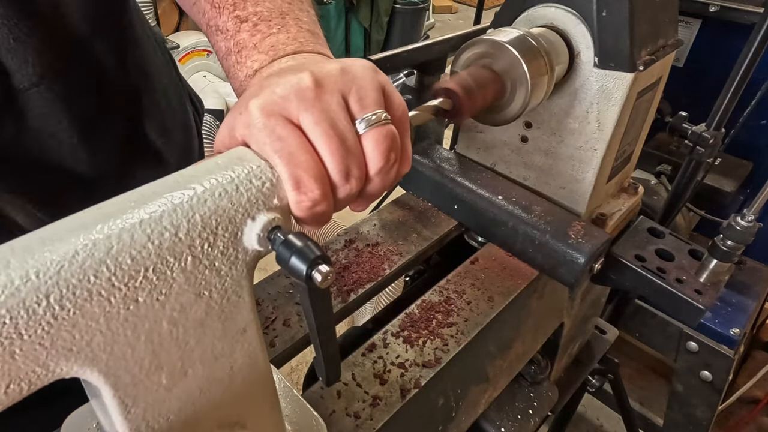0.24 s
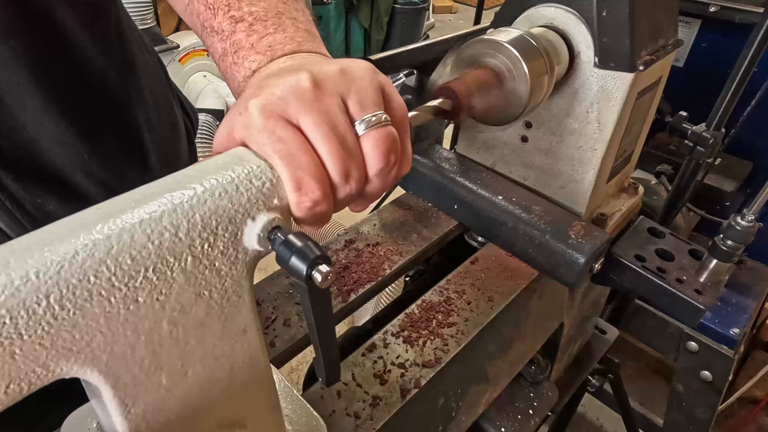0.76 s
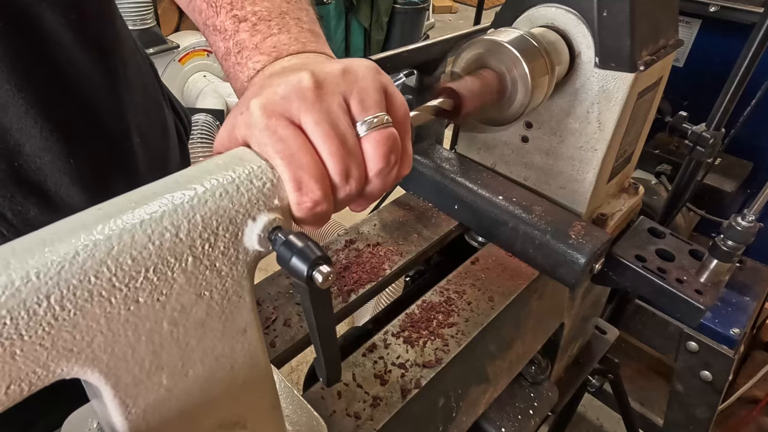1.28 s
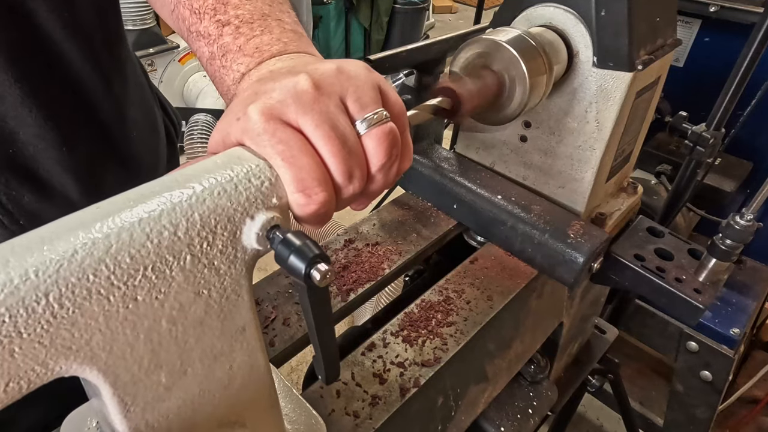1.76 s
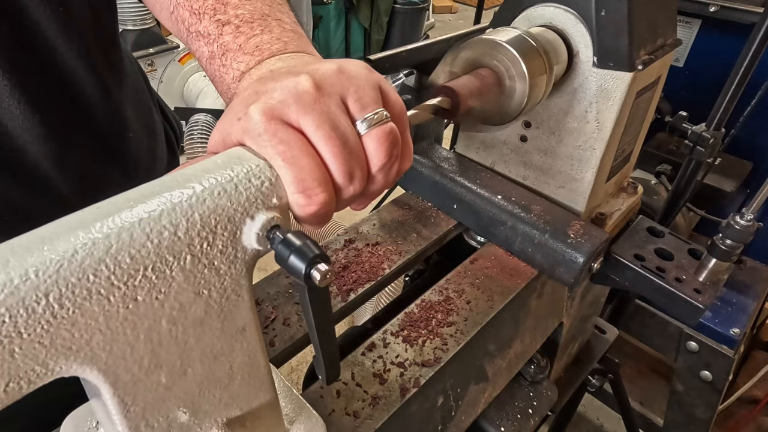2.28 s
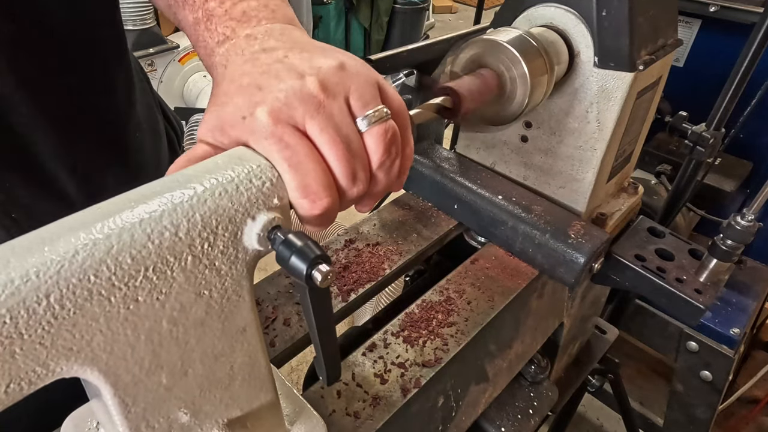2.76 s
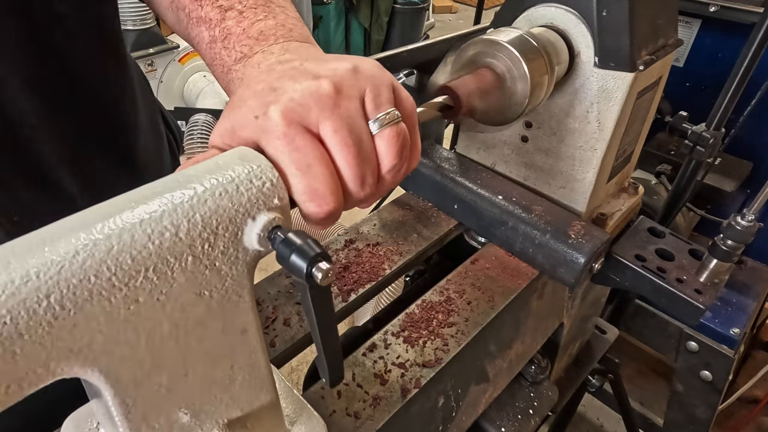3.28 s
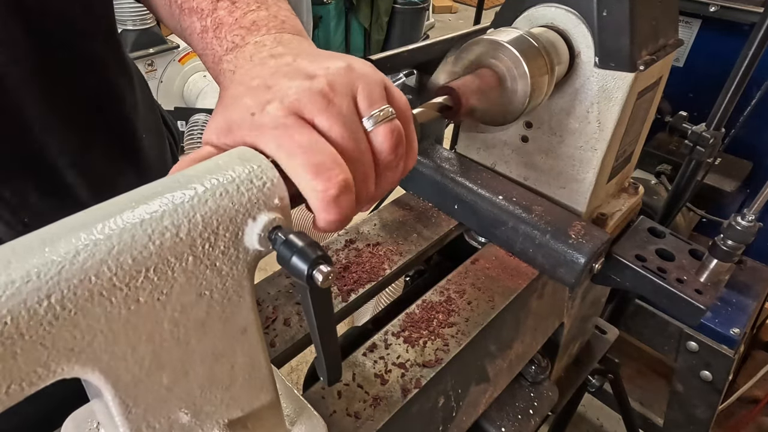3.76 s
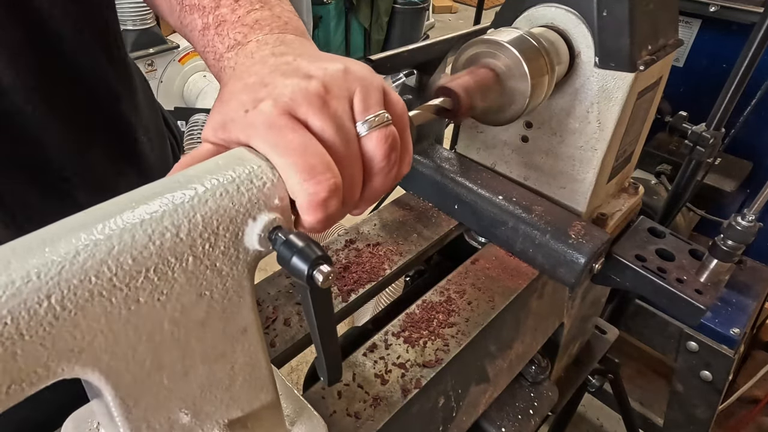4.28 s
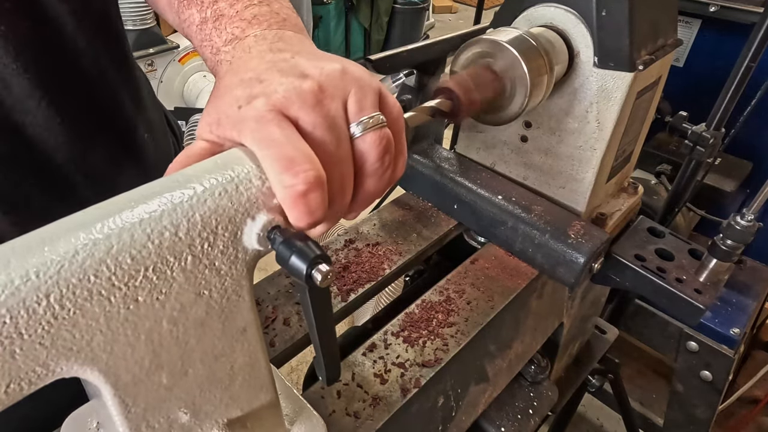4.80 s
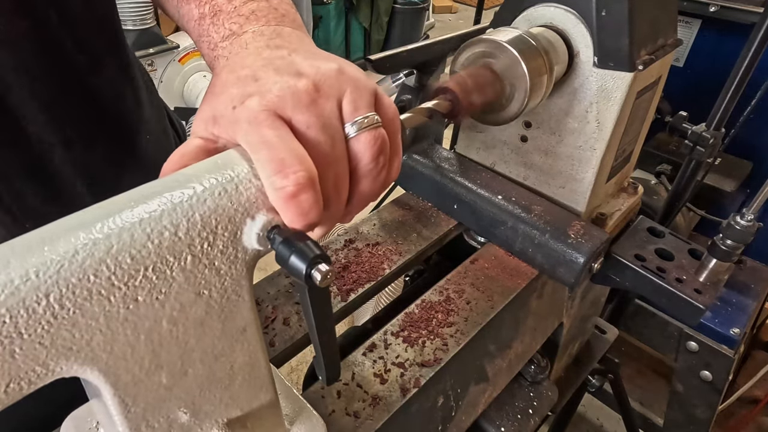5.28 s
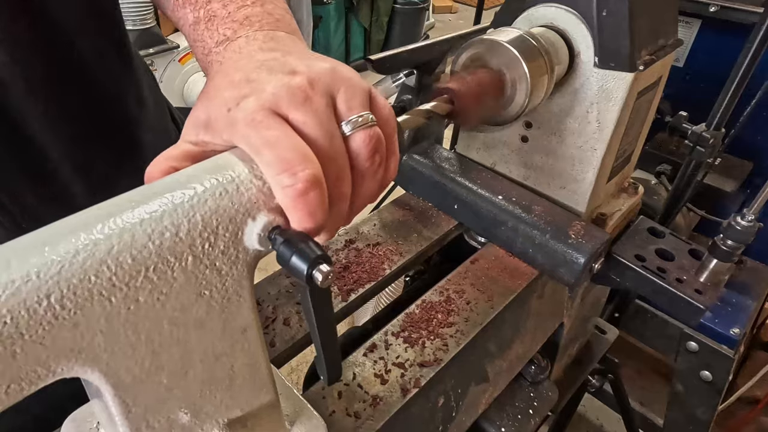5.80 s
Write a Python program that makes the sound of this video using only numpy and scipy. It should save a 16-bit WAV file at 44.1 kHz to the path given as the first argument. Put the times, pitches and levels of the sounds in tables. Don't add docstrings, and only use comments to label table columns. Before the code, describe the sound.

Harsh chirping squeals repeat once per turn as a bit grinds into a wood blank, easing into a smoother rasp, then chattering and squealing hard again.

```python
import sys
import numpy as np
from scipy import signal
from scipy.fft import rfft, irfft, next_fast_len
from scipy.io import wavfile
from scipy.ndimage import uniform_filter1d

SR = 44100
rng = np.random.default_rng(int(sys.argv[2]) if len(sys.argv) > 2 else 0)


def gain_from_db(level_db):
    decades = np.asarray(level_db, float) / 20
    return 10 ** decades


def file_out(sig):
    cols = np.atleast_2d(sig).T
    lim = np.clip(cols, -1, 1)
    pcm = np.round(lim * 32767).astype(np.int16)
    wavfile.write(sys.argv[1], SR, pcm)


N = 266364
T = np.arange(N) / SR

# time_s, turns_made
SPINDLE = [(0, 0), (.2528, 6), (.8056, 20), (1.062, 27), (1.4172, 37), (2.142, 58), (4.7895, 135),
           (6.04, 171.4)]


def level(x, db):
    return x * gain_from_db(db) / np.sqrt(np.mean(x ** 2))


def on_log(table, hz):
    f, db = np.transpose(table)
    return np.interp(np.log(np.maximum(hz, 1)), np.log(f), db)


def colour(x, table):
    size = next_fast_len(N + 4096)
    hz = np.arange(size // 2 + 1) * SR / size
    return irfft(rfft(x, size) * gain_from_db(on_log(table, hz)), size)[..., :N]


def noise(table, db):
    return level(colour(rng.standard_normal(N), table), db)


def curves(table, outside=None):
    s, *columns = np.transpose(table)
    return [np.interp(T, s, c, left=outside, right=outside) for c in columns]


def ring(x, hz, width_hz):
    return signal.lfilter(*signal.iirpeak(hz, hz / width_hz, SR), x)


def walk(rate_hz):
    k = max(int(SR / rate_hz), 1)
    return level(uniform_filter1d(uniform_filter1d(rng.standard_normal(N), k), k), 0)


def hoarse(hz, width_hz, steady=0):
    return (steady + walk(width_hz)) * np.sin(2 * np.pi * np.cumsum(hz * np.ones(N)) / SR)


def per_turn(turns, memory, size=1536):
    fresh = rng.standard_normal((220, size))
    rows = signal.lfilter([np.sqrt(1 - memory ** 2)], [1, -memory], fresh, axis=0)[40:]
    return np.interp(turns * size, np.arange(rows.size), rows.ravel())


def orders(table, turns):
    out = 0
    for multiple, db in table:
        wander_db = 4 * walk(6.2)
        out = out + gain_from_db(db + wander_db) * np.sin(2 * np.pi * round(multiple) * turns)
    return out


def aftermath(tables, depth_db, fade_s):
    kicks = np.zeros(N)
    for rows, db in zip(tables, depth_db):
        kicks[(rows[:, 0] * SR).astype(int)] = gain_from_db(rows[:, 1] + db)
    trace = signal.lfilter([1], [1, -np.exp(-1 / (fade_s * SR))], kicks)
    return uniform_filter1d(trace, size=441)


def all_squeals():
    # start_s, peak_db, settled_pitch_hz, starting_pitch_share, length_ms
    entry = [(0.0004, -13.5, 2050, 0.78, 13.5), (0.0422, -13.5, 2016, 0.85, 16),
             (0.0847, -16, 2100, 0.79, 12), (0.1276, -14.5, 2180, 0.77, 13.6),
             (0.168, -13.5, 2120, 0.77, 12), (0.2102, -15, 2080, 0.78, 11.4), (0.2515, -14, 2000, 0.88, 11)]
    shallow = [(0.8051, -15, 1997, 0.67, 7.4), (0.8767, -17.5, 1942, 0.92, 14),
               (0.9515, -18, 1900, 0.88, 14.6), (0.988, -18.5, 1940, 0.83, 11),
               (1.061, -17, 1908, 0.95, 13), (1.415, -16, 1917, 0.87, 13.7)]
    middle = [(3.206, -10.5, 1601, 0.86, 8.5), (3.3785, -14, 1550, 0.59, 10.3),
              (3.4481, -16, 1476, 0.58, 12.6), (3.5162, -15, 1495, 0.77, 11.2),
              (3.6556, -12, 1503, 0.94, 8.4), (3.7224, -15.5, 1524, 0.78, 12.3),
              (4.099, -15, 1576, 0.76, 12.5)]
    re_entry = [
        (2.6535, -26, 1762, 0.75, 29),
        (2.6876, -22, 1805, 0.8, 17),
        (2.724, -13, 1860, 0.9, 6.5),
    ]
    loose_turns = 6
    deep, loose = np.split(binding(), [-loose_turns])
    return [np.array(entry), np.array(shallow), np.array(middle), deep, loose, np.array(re_entry)]


def squeals(table, depth):
    # multiple, entry_db, shallow_db, middle_db, deep_db, re_entry_db
    overtones = np.array([(1, 5, 4, -2.5, 2.5, 4.5), (2, 1.5, 0, -1.5, -5.5, 3.5),
                          (3, -2, 0.5, -12, -5, -1), (4, -6.5, -9.5, -36, -7, -13),
                          (5, -31, -28, -29, -16.5, -31), (6, -6, -8.5, -44, -13.5, -8),
                          (7, -11, -14, -20, -4, -30)])
    # lead_in_s, settling_s, tone_rise_s, first_jolt_share, scrape_db, ring_on_s
    grips = [
        (0, 0.009, 0.0011, 0.7, -14, 0.0055),
        (0, 0.00534, 0.001, 0.55, -6.5, 0.0057),
        (0, .0055, .0035, .05, -5.5, .003),
        (.0042, 0.0028, 0.0017, 0.3, -11, 0.0055),
        (0.001, 0.0045, 0.0006, 0.3, -13, 0.0012),
        (0, 0.008, 0.002, 0.3, -5.5, 0.005),
    ]
    # dip_share, dip_s, rebound_db, glide_bend, overtone_rise_s
    stumbles = [
        (0.85, 0.007, -13, 1.6, 0.001),
        (0.2, 0.007, -16, 1.1, 0.0014),
        (0.1, 0.006, -18, 1.3, 0.004),
        (0.35, 0.005, -9, 1.6, 0.0012),
        (0.8, 0.0038, -5, 2.2, 0.0007),
        (0.3, 0.005, -12, 1.8, 0.002),
    ]
    blur_rad = [0.2, 0.3, 0.4, 0.2, 0.25, 0.35]
    # crack at the first jolt over the scrape, db
    crack_db = [-1, -0.5, 5, -2, -14, 7]
    # overtone waning, fade_s
    edge_fade_s = [0.049, 0.031, 0.042, 0.016, 0.025, 0.013]
    # overtones gathering after the jolt, rise_s
    over_rise_s = [0.0033, 0.0014, .001, 0.00032, 0.00047, 0.0023]
    # torn fibre between overtones, db
    grit_db = [-14, -6, -17, -14.5, -20, -5]
    # hz, db_per_hz
    grit_spectrum = [(1000, -29), (1400, -11.5), (1900, 20), (2700, -10), (3400, -8.5), (4200, -14)]
    # hz, db
    camera = [(200, -27), (700, -11), (1300, 6), (2400, -6), (3150, 1), (3900, 1), (4500, -2), (5000, -14),
              (5800, 1), (8000, -7), (12500, -1), (14300, -48), (15000, -40)]

    out, t = np.zeros(N + 4096), T[:2048]
    k = overtones[:, :1].astype(int)
    over_db = overtones[:, (1, 2, 3, 4, 4, 5)[depth], None]
    if depth == 4:
        over_db = over_db - 4.5 * (k > 1)
    lead_s, settle_s, rise_s, jolt, scrape_db, hang_s = grips[depth]
    dip, dip_s, rebound_db, bend, edge_rise_s = stumbles[depth]
    waver, tremble, flutter = walk(670), walk(440), walk(370)
    blur = blur_rad[depth] * walk(1800)
    scrape = noise([(900, -16.0), (2200, 3.0), (12000, -18.5)], scrape_db)
    grit = noise(grit_spectrum, grit_db[depth])
    for s, db, hz, start, ms in table:
        i = max(int((s - lead_s) * SR), 0)
        here = np.minimum(i + np.arange(len(t)), N - 1)
        held = np.maximum(t - lead_s, 0)
        after = np.maximum(held - ms / 1000, 0)

        glide = 1 + (start - 1) * np.exp(-(t / settle_s) ** bend)
        pitch = hz * glide * (1 + .01 * waver[here])
        phase = k * 2 * np.pi * np.cumsum(pitch) / SR + 1.19 * k * k
        phase = phase + np.maximum(k - 1.5, 0) * blur[here]
        flicker_db = 1.5 * flutter[(here + 5000 * k) % N] * (k > 1)
        stack = gain_from_db(over_db + flicker_db) * np.sin(phase)

        grip = 1 - jolt + jolt * np.exp(-(held / 0.0038) ** 2)
        grip = grip * (1 - dip * np.exp(-((held - dip_s) / 0.0017) ** 2))
        dulled = (stack * gain_from_db(-4 * (k + 1))).sum(axis=0)
        rebound = gain_from_db(rebound_db) * dulled * np.exp(-((held - ms / 1000 - 0.0085) / 0.0035) ** 2)

        tone = stack[0] * (1 - np.exp(-t / rise_s)) ** 2 * np.exp(-after / hang_s)
        tone = tone * gain_from_db(0.7 * tremble[here])
        over = stack[1:].sum(axis=0) * np.exp(-held / edge_fade_s[depth])
        over = over * (1 - np.exp(-held / over_rise_s[depth]))
        torn = 2 * grit[here] * np.exp(-held / 0.0097)
        crack = np.exp(-held / 0.015) + gain_from_db(crack_db[depth]) * np.exp(-held / 0.0016)
        edge = over + torn + 1.48 * scrape[here] * crack
        edge = edge * (1 - np.exp(-held / edge_rise_s)) * np.exp(-after / 0.0016)
        burst = (tone + edge * gain_from_db(flutter[here])) * grip + rebound
        out[i:i + len(t)] += burst * gain_from_db(db - 9.5)
    return colour(out[:N], camera)


def fibre_rasp(turns, even, slow, shear):
    # hz, db_per_hz
    spectrum = [(560, -64), (950, -26), (1210, -2), (1410, -2), (2190, 2.5), (2500, -3), (3110, -10),
                (3320, -12.5), (5950, -43), (9000, -64), (11700, -74), (19800, -120)]
    # multiple_of_turn, db
    cut_orders = [(42, -8), (60, -8), (75, -25)]
    # time_s, share
    order_share = [(1.6, .4), (2.2, 1), (2.7, 0.43), (3.1, 0.2), (3.4, 0.1), (6, 0.2)]
    torn = per_turn(turns, 0.69) * gain_from_db(2.0 * walk(220))
    sheared = per_turn(turns, 0.95)
    fibres = level(colour(shear * sheared + np.sqrt(1 - shear ** 2) * torn, spectrum), -0.9)
    share, = curves(order_share)
    return fibres + orders(cut_orders, even) * gain_from_db(3 * slow) * share


def bit_song(tables, song_hz):
    song_db = [-44.5, -41, -48, -55.5, -69, -45.5]
    octave_db = [-8, -9, 4.5, -2, -8, -0.5]
    fade_s = 0.17
    sing = aftermath(tables, np.add(song_db, 17), fade_s)
    octave = aftermath(tables, np.add(song_db, octave_db) + 13, fade_s)
    return sing * hoarse(song_hz, 360) + octave * hoarse(2.07 * song_hz, 520)


def dust(tables, turns, feed_db, bite, ride):
    # hz, db_per_hz
    spectrum = [(2350, -9.5), (4000, -3.5), (4660, -8), (5000, -9.5), (5980, -3), (8950, -20), (9640, -17),
                (10800, -10.5), (14200, -28)]
    shed_db = [-59.5, -56.5, -64, -61, -67, -65]
    shed = aftermath(tables, np.add(shed_db, 17), 0.052)
    chip = 1 - 1.54 * bite + 2.0 * bite * np.exp(-(turns % 1))
    hiss = level(colour(rng.standard_normal(N) * gain_from_db(2.7 * walk(370)), spectrum), 3.2)
    return hiss * chip * (gain_from_db(-65.5 + 0.69 * feed_db + 7.5 * ride) + shed)


def headstock(even, slow, feed_db, ride, true):
    # hz, db_per_hz
    spectrum = [(12, -67), (20, -28.5), (101, -24.5), (129, -19.5), (225, -17), (345, -3), (381, -11),
                (441, -1.5), (471, -19.5), (675, -3), (721, -9), (835, -7), (1000, -12), (1300, -6.5),
                (2200, -120)]
    # multiple_of_turn, db
    hum_orders = [(10, -5), (11, -8.5), (12, -1.5), (14, -6), (15, -2.5), (16, -8), (20, -11), (23, -16),
                  (26, -29), (29, -7)]
    loose = true * per_turn(even, 0.89) + 0.33 * np.sqrt(1 - true ** 2) * walk(SR / 29)
    hum = level(colour(loose, spectrum), 0.14) + true ** 2 * colour(orders(hum_orders, even), spectrum)
    return hum * gain_from_db(-46 + feed_db + 3 * slow + 16.5 * ride)


def lathe_bed(even, feed_db, ride, true):
    # pitch_hz, width_hz, level_db
    resonances = [(345.4, 19, -56.5), (421.3, 26.4, -57.5)]
    shake = per_turn(even, 0.913)
    drone = sum(level(ring(ring(shake, hz, wide), hz, wide), db) for hz, wide, db in resonances)
    return drone * (0.46 + 0.62 * true) * gain_from_db(0.66 * feed_db + 16.5 * ride)


def lathe(tables):
    # time_s, feed_pressure_db, bite_depth_share, song_hz
    cut = [(0.0, 5.5, 0.07, 1855), (0.29, 10, 0.33, 1864), (0.42, 8, 0.81, 1880), (0.622, 6, 0.75, 1926),
           (0.789, 4.5, 0.28, 1856), (1.307, 0.5, 0, 1856), (1.7, 0.5, 0.54, 1837), (1.93, 2, 0.44, 1814),
           (2.151, 5.5, 0, 1800), (2.522, 4.5, 0.3, 1777), (2.699, 10.5, 0.48, 1882),
           (2.95, 2.5, 0.5, 1747), (3.202, 6, 0.57, 1509), (4, 3, 0.61, 1435), (4.6, 3, 0.44, 1475),
           (4.879, 5, 0.71, 2094), (5.349, 6.5, 0, 1981), (6.04, 1, 0.16, 1914)]
    # time_s, shear_share, level_lost_between_share
    shearing = [(1.5, 0, 0), (1.8, 0.75, 0.15), (1.95, 0.8, 0.62), (2.35, 0.8, 0.55), (2.6, 0.5, 0.3),
                (2.75, 0, 0)]
    # time_s, share
    steadiness = [(0, 0.8), (0.5, 0.65), (0.85, 0.99), (1.5, 0.58), (1.7, 1), (2.68, 0.86), (2.8, 0.88),
                  (3.3, 0.38), (4.3, 0.82), (4.6, 0.82), (5.0, 0.62), (5.2, 0)]
    feed_db, bite, song_hz = curves(cut)
    turns, = curves(SPINDLE)
    shear, drop = curves(shearing)
    true, = curves(steadiness)
    slow = uniform_filter1d(np.gradient(turns) * SR, size=8820) - 29
    even = np.cumsum(slow + 29) / SR
    ride = -np.log10(2.5 + aftermath(tables, [31] * len(tables), 0.079))

    once_a_turn = uniform_filter1d(np.exp(-((turns + 0.077) % 1) / 0.11), size=130)
    swell = 1 - bite + 0.6 * bite * once_a_turn
    swell = swell + shear * (1 - bite / 2 - swell)
    on_turn, off_turn = -0.08, 0.45
    since_entry = (turns - on_turn) % 1
    idle = since_entry > off_turn - on_turn
    lip = 1 - drop * (uniform_filter1d(1. * idle, size=88) - .5)
    lip = lip + 0.43 * drop * np.exp(-since_entry / 0.027)

    rasp = fibre_rasp(turns, even, slow, shear) * gain_from_db(-39 + feed_db + 8 * ride)
    rasp = (rasp + bit_song(tables, song_hz)) * swell * lip * gain_from_db(walk(4.8))
    steady = lathe_bed(even, feed_db, ride, true) + headstock(even, slow, feed_db, ride, true)
    return rasp + dust(tables, turns, feed_db, bite, ride) * lip + steady


def shop_rumble():
    return noise([(20, -25), (60, -51), (160, 4.5), (260, -23.5)], -68.5)


def shop(x):
    # top_hz, t60_s, level_db
    bands = [(2600, 0.66, -7), (5000, 0.4, -6.5), (14600, 0.067, -10)]
    t, hiss, tail, below = T[:30000], rng.standard_normal(30000), 0, 0
    for top_hz, t60_s, db in bands:
        low = signal.sosfilt(signal.butter(4, top_hz, fs=SR, output="sos"), hiss)
        decay = gain_from_db(-60 * t / t60_s) * (1 - np.exp(-t / .016))
        tail = tail + (low - below) * decay * gain_from_db(db) / np.linalg.norm(decay)
        below = low
    return signal.fftconvolve(x, tail)[:N]


def whine():
    # time_s, level_db
    whine_level = [(0.05, -56), (0.45, -49.5), (0.9, -57), (1.218, -51.5), (1.46, -62), (1.74, -68),
                   (1.9, -74), (2.25, -64), (2.5, -89)]
    hz = 5134
    db, = curves(whine_level, outside=-90)
    octave_db = -85 + 2.5 * (db + 57)
    low = gain_from_db(db) * 0.58 * hoarse(hz, 310, steady=1.3)
    return low + gain_from_db(octave_db) * hoarse(2 * hz, 360, steady=1.2)


def catches():
    # start_s, peak_db, brightness_db
    events = [(0.295, -44, -10), (0.3405, -96, -15), (0.54, -45, -9), (0.763, -36, -14), (1.1343, -61, -29),
              (1.166, -37.5, -9), (1.3768, -44.5, -17), (2.448, -37.5, -17), (2.487, -39, -23),
              (2.751, -60, -16), (2.9664, -29.5, -32), (2.9983, -29, -36), (3.033, -30.5, -35),
              (3.106, -41, -26), (3.1767, -35, -37), (3.342, -35.5, -27), (3.8013, -37.5, -31),
              (3.9006, -85, -87), (3.932, -36, -46), (3.967, -36.5, -33), (4.0649, -31.5, -19),
              (4.201, -35, -22), (4.337, -31.5, -14.5), (4.6843, -37, -47), (4.754, -37, -36),
              (4.787, -35.5, -22), (4.895, -39, -54), (4.923, -30.5, -36), (4.959, -35.5, -51),
              (4.9734, -62, -18), (5.1116, -48, -3)]
    # pitch_hz, width_hz, level_db
    blank = [(1356, 85, 16), (1663, 21, 15), (2400, 96, 10.5), (2746, 36, 4.5), (3020, 16, 4),
             (6200, 64, -37), (6600, 98, 1)]
    # hz, db_per_hz
    thud = [(250, -36), (450, 3), (700, -3), (900, 8), (1200, -32)]
    s, db, bright_db = np.transpose(events)
    hits = np.zeros((2, N))
    hits[:, (s * SR).astype(int)] = gain_from_db([db - 2.0, db + bright_db + 0.5])
    age = T[:1500] / 0.0058
    push, bright = signal.fftconvolve(hits, [age * np.exp(1 - age)], axes=1)[:, :N]
    grit = rng.standard_normal(N) * gain_from_db(2.5 * walk(900))
    body = sum(gain_from_db(gain_db) * ring(grit * push, hz, 2 * max(wide, 30)) for hz, wide, gain_db in blank)
    body = colour(body, [(700, -20), (1000, 0), (3500, 0), (7000, -20)])
    body = body * np.sqrt(np.mean(push ** 2) / np.mean(body ** 2))
    dull = [(2000, -10), (3500, 0), (6500, -10), (9000, -28), (14000, -40)]
    return body + push * noise(thud, -16) + bright * level(colour(grit, dull), 0)


def knocks():
    # start_s, peak_db, pitch_hz
    knock_events = [(3.552, -33, 1370), (3.5778, -32, 1370), (3.7594, -42, 1380), (3.8304, -48, 1460),
                    (3.869, -49, 1700), (3.9991, -41, 1190), (4.0284, -34, 1204), (4.1394, -41, 1410),
                    (4.1706, -36, 1610), (4.24, -32, 1490), (4.269, -37, 1450), (4.3035, -41, 1560),
                    (4.3757, -30, 1280), (4.4104, -31, 1270), (4.4447, -35, 1226), (4.4806, -31.5, 1460),
                    (4.5201, -37, 1340), (4.551, -33, 1315), (4.58, -32, 1280), (4.6174, -26.5, 1366),
                    (4.652, -28.5, 1473), (4.6866, -31.5, 1230), (4.7197, -33, 1330), (4.7538, -27.5, 1625),
                    (4.8236, -27.5, 1630), (4.859, -39, 1560), (4.8915, -28, 1360), (4.9281, -24, 1238),
                    (4.9601, -27, 1262),
                    (0.3091, -29, 1780), (0.3494, -27.5, 2160), (0.3894, -37, 2130), (0.4294, -41, 2140),
                   (0.4658, -33.5, 2134), (0.5057, -31, 2030), (0.5457, -28, 2160), (0.5851, -31, 2190),
                   (0.6294, -40, 2180), (0.6669, -40, 2120), (0.7094, -39, 2100), (0.7632, -24.5, 2330),
                   (0.7844, -25, 2100), (0.847, -29, 2050), (0.9144, -32, 1876), (1.0243, -27, 1830),
                   (1.0996, -31, 1850), (1.1337, -32, 1790), (1.1649, -28, 1747), (1.2027, -29.5, 1780),
                   (1.2391, -26, 2015), (1.2757, -25.5, 1787), (1.3097, -31, 1800), (1.345, -29, 1756),
                   (1.3796, -23, 1763), (3.6744, -27, 1740), (3.7449, -35, 1730)]
    out, t = np.zeros(N), T[:1200]
    rise_s = 0.00408
    push = t / rise_s * np.exp(1 - t / rise_s)
    rough = 0.69 * walk(450)
    for s, db, hz in knock_events:
        i = int((s - rise_s) * SR)
        tone = np.sin(2 * np.pi * hz * t + rough[i:i + len(t)])
        out[i:i + len(t)] += gain_from_db(db - 6) * push * tone
    return out


def belt_and_bed():
    # time_s, pitch_hz, level_db
    drone_early = [(0.32, 423.6, -63), (0.694, 413, -59), (0.8, 426, -46), (0.81, 417.8, -54)]
    # time_s, pitch_hz, level_db
    belt = [(1.05, 715, -80), (1.15, 735, -60), (1.38, 760, -58), (1.45, 765, -80)]
    # time_s, pitch_hz, level_db
    drone_cut = [(1.58, 352.1, -60), (1.62, 349.3, -54), (2.106, 348.9, -58), (2.436, 348.6, -46),
                 (2.696, 347.8, -53), (2.72, 348.3, -65)]
    out = 0
    for table, trim_db in ((drone_early, -9), (belt, -7), (drone_cut, -9)):
        hz, _ = curves(table)
        _, db = curves(table, outside=-99)
        gain = uniform_filter1d(gain_from_db(db + trim_db), size=1500)
        out = out + hoarse(hz, 12, steady=2.5) * gain
    return out


def wall_scrape():
    # time_s, pitch_hz, level_db
    scrape = [(4.55, 2520, -48), (4.671, 2464, -41), (4.943, 2600, -29), (5.119, 2415, -41),
              (5.2, 2400, -58)]
    hz, _ = curves(scrape)
    _, db = curves(scrape, outside=-90)
    return hoarse(hz, 1200) * gain_from_db(db - 8)


def false_starts():
    # start_s, level_db, starting_hz, length_s
    chirps = [(4.9723, -32.5, 2860, 0.0093), (5.1115, -33.5, 2600, 0.013), (4.831, -36, 2950, 0.012)]
    fall_hz_per_s = 37600
    out, rough, blur = np.zeros(N), gain_from_db(3.6 * walk(400)), 1.3 * walk(700)
    for s, db, hz, long_s in chirps:
        age = np.clip(T - s, 0, long_s)
        swell = np.abs(np.sin(np.pi * age / long_s)) ** 0.19
        out += gain_from_db(db) * swell * np.sin(2 * np.pi * (hz - fall_hz_per_s * age / 2) * age + blur)
    return out * rough


def binding():
    # time_s, seizing_angle_turns, peak_db, settled_pitch_hz, starting_pitch_share
    bind = [(5, 0.32, -10.5, 2058, 1.5), (5.043, 0.35, -17, 1957, 1.4), (5.13, 0.29, -13.5, 2008, 1.6),
            (5.4, 0.25, -15.5, 1934, 1.31), (5.65, 0.17, -15, 1922, 1.54), (5.787, 0.21, -15, 1897, 1.32),
            (5.89, 0.31, -11, 1917, 1.29), (6.002, 0.36, -12.5, 1937, 1.22)]
    bound_turns = np.r_[141, 142, 145:171]
    release_turn = 0.54
    scatter = (0.02, 0.92, 0.0053, 0.032)  # turns, dB, pitch share, start share
    clock_s, made = np.transpose(SPINDLE)
    s, *columns = np.transpose(bind)
    turn_s = np.interp(bound_turns, made, clock_s)
    angle, db, hz, start = (np.interp(turn_s, s, c) for c in columns)
    chance = (rng.standard_normal((len(bound_turns), 4)) * scatter).T
    seize_s = np.interp(bound_turns + angle + chance[0], made, clock_s)
    free_s = np.interp(bound_turns + release_turn, made, clock_s)
    length_ms = 1000 * (free_s - seize_s)
    return np.transpose([seize_s, db + chance[1], hz * (1 + chance[2]), start * (1 + chance[3]), length_ms])


def two_ports(mid):
    # hz, db
    ports = [(30, -18), (125, -29), (300, -57), (600, -36), (1200, -41), (2500, -86), (4500, -27),
             (8000, -54), (11000, -14.5), (14000, 4)]
    # hz, db
    right_lean = [(3500, -41.5), (7000, -20), (12000, -19)]
    # hz, db_per_hz
    port_hiss = [(30, -6), (150, 0), (400, 2), (1000, -22), (8000, -25), (10500, -8), (13500, -1)]
    path = irfft(np.exp(2j * np.pi * rng.random(1025)))
    side = colour(signal.fftconvolve(mid, path)[:N], ports) - colour(mid, right_lean)
    side = side + noise(port_hiss, -79)
    return np.array([mid + side, mid - side])


def scene():
    tables = all_squeals()
    bursts = sum(squeals(table, depth) for depth, table in enumerate(tables))
    bursts = bursts + catches() + knocks() + false_starts()
    steady = lathe(tables) + shop_rumble() + whine() + belt_and_bed() + wall_scrape()
    return two_ports(bursts + shop(bursts) + steady)


def low_pass(x):
    return signal.sosfilt(signal.butter(12, 14340, fs=SR, output="sos"), x)


def record(dry):
    # hz, db
    body_notch = [(8750, 0), (9000, -16), (9200, -16), (9450, 0), (13400, 0), (14300, -14), (15000, -40)]
    return low_pass(colour(dry, body_notch))


dry = scene()
out = record(dry)
file_out(out)
```